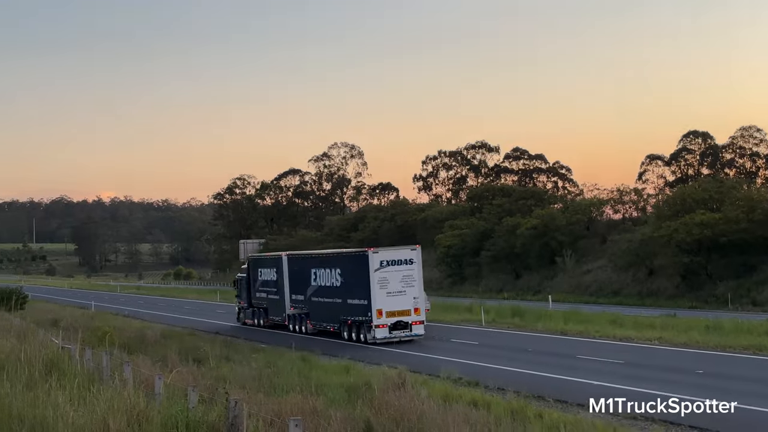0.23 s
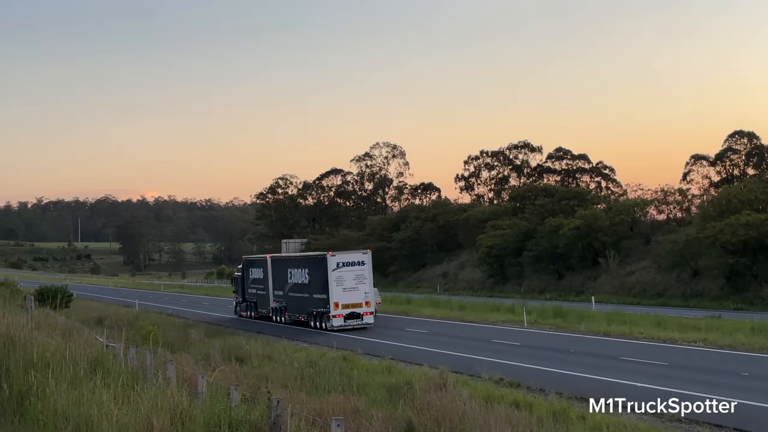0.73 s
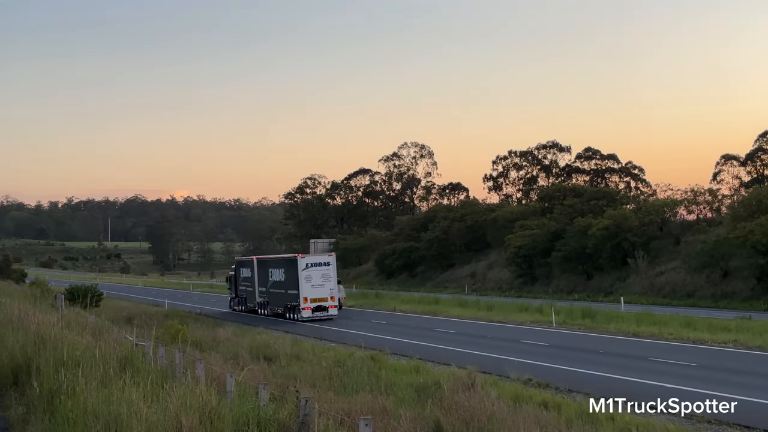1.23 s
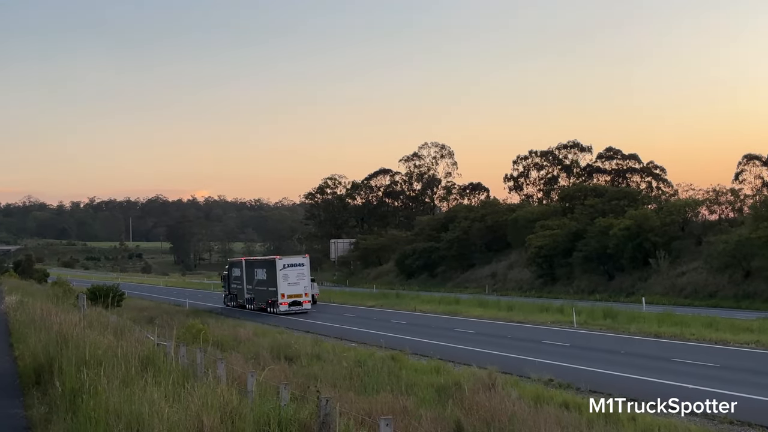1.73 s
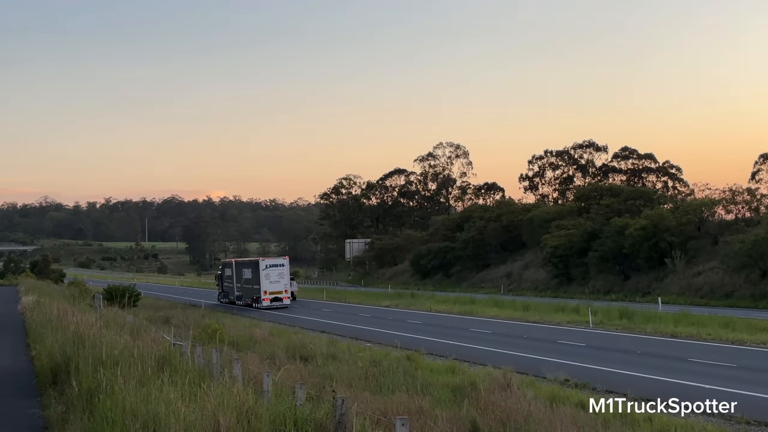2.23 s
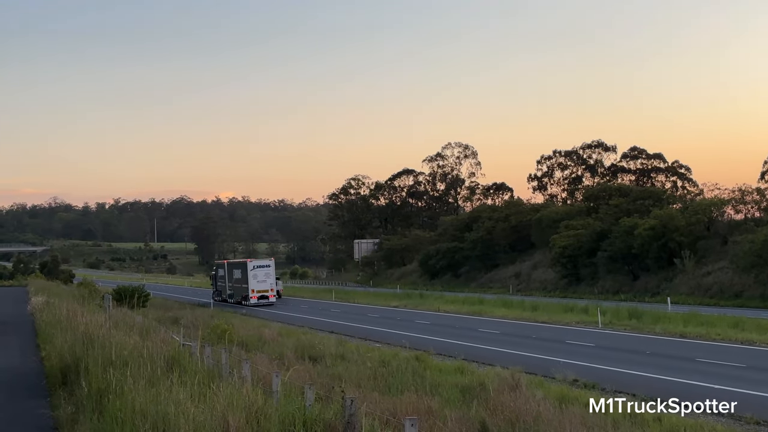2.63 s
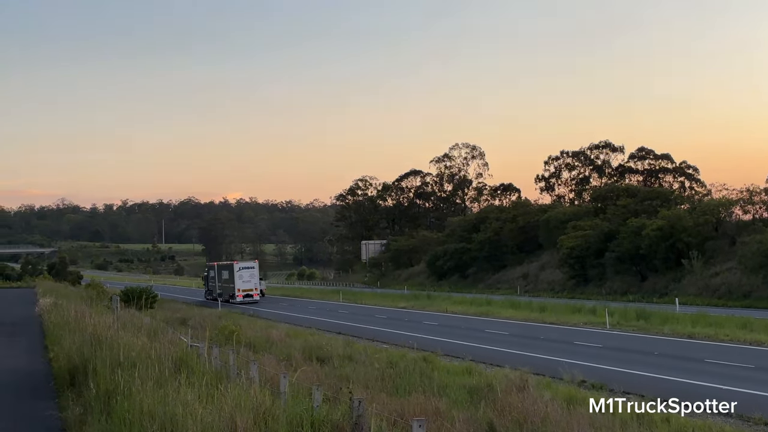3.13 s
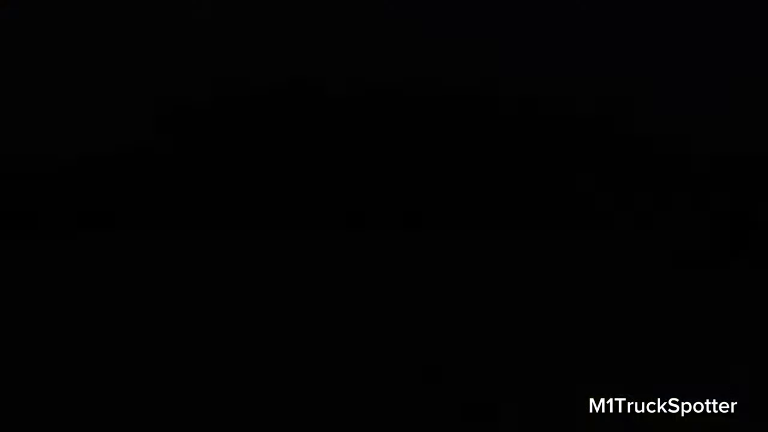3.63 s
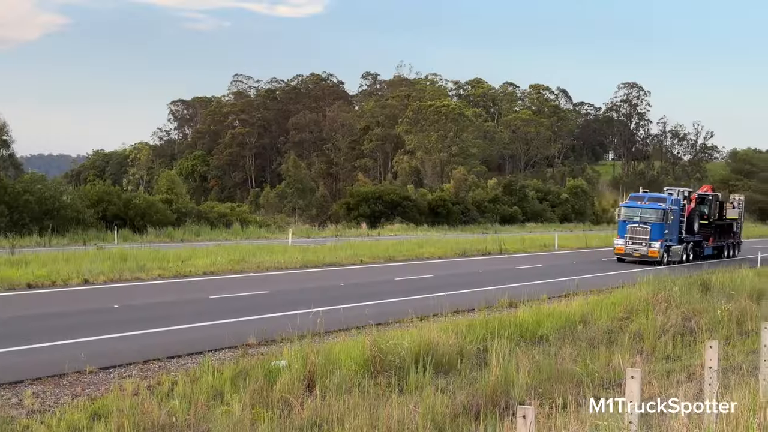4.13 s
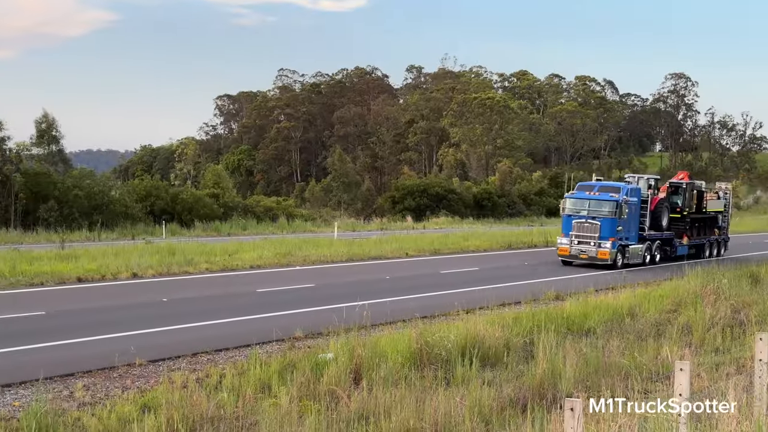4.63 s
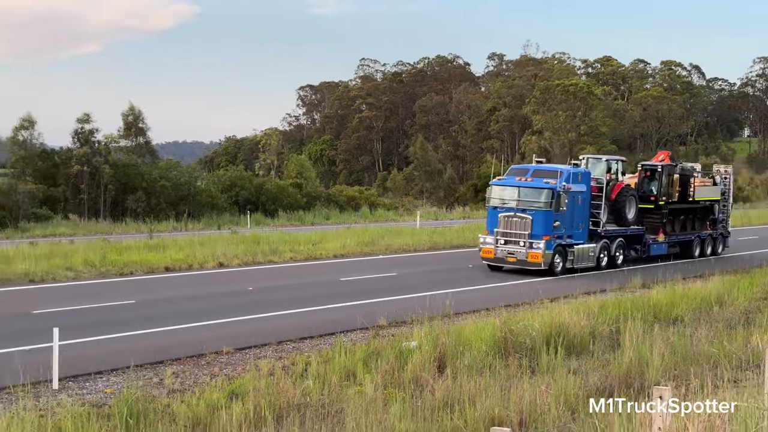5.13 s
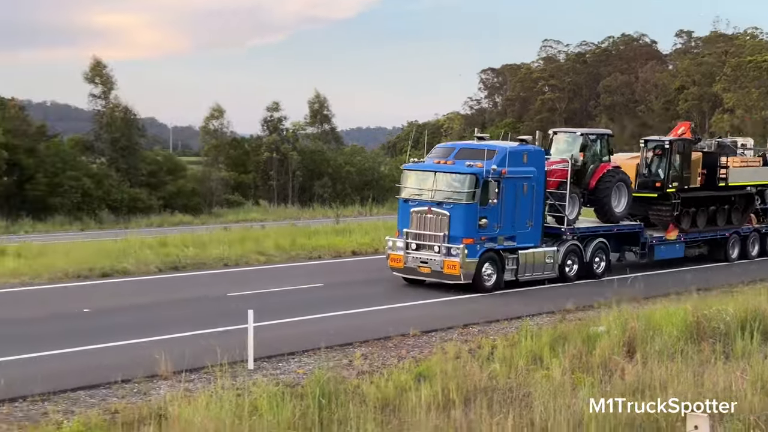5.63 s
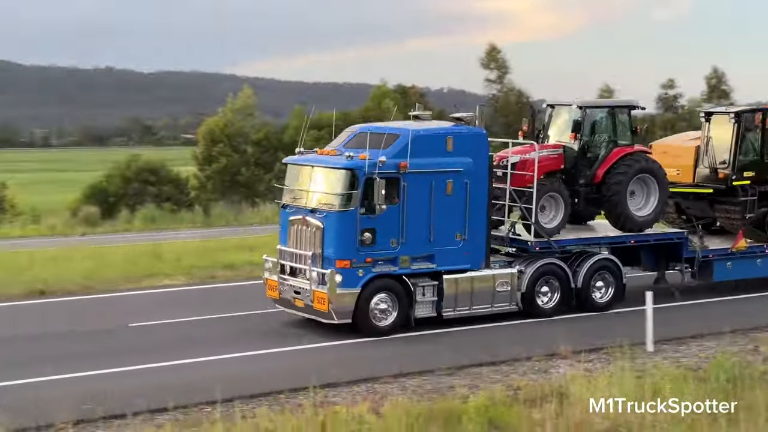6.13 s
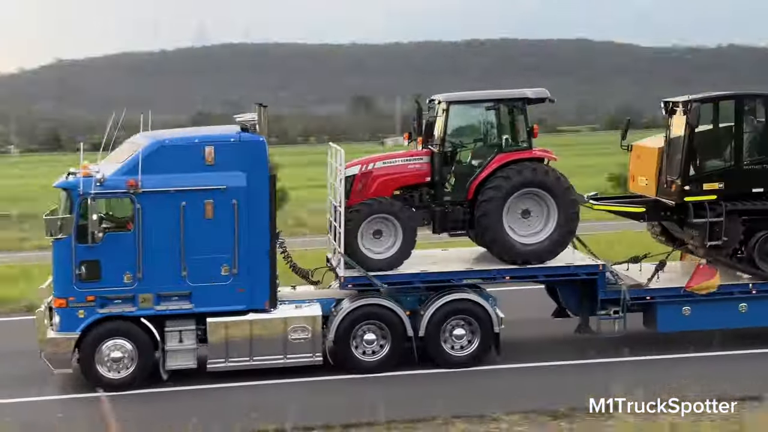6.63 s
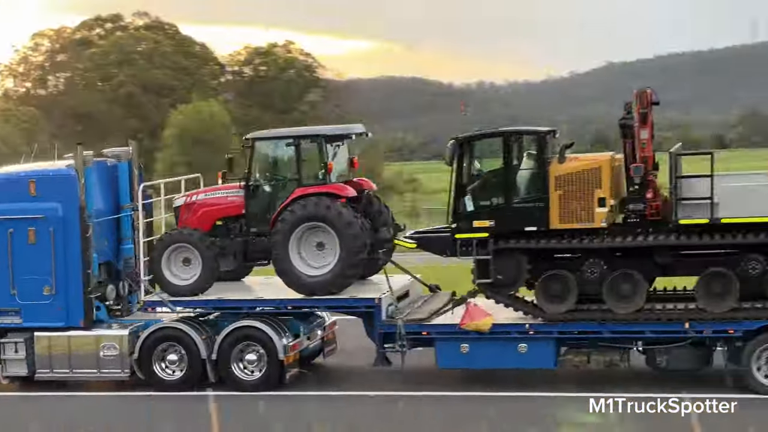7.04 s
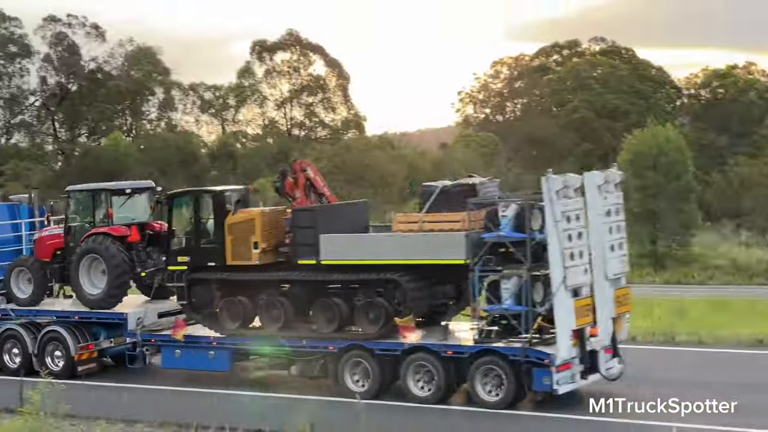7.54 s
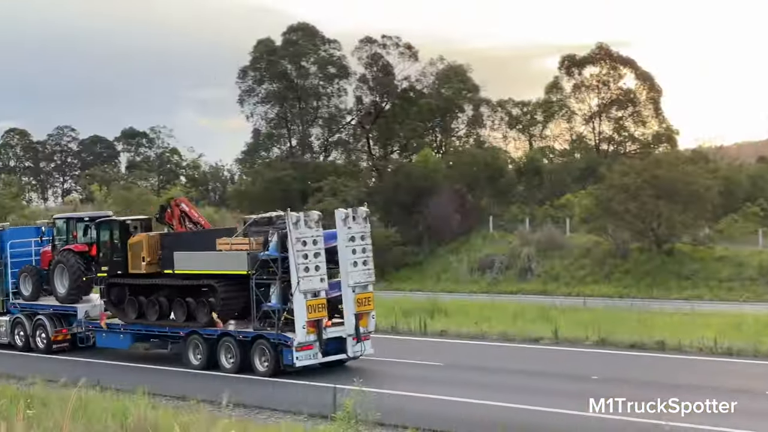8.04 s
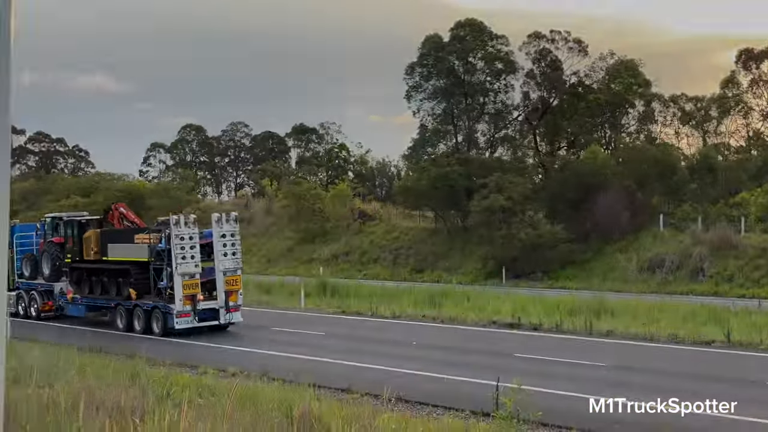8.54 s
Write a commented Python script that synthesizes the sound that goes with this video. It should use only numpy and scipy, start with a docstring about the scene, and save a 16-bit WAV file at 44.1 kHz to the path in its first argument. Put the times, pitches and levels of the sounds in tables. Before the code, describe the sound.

Beside a highway, one truck recedes in fading tyre hiss; a sudden cut brings another passing close with deep engine drone and rattling chains.

```python
"""Beside a country highway a heavy truck recedes, its tyres roaring ever more dully, with insects in the grass.
After an abrupt cut a second diesel truck passes close by at a steady speed: its exhaust drone falls in pitch
and is combed by the reflection off the road, over gear whine, tyre roar, a thin turbo whistle and rattling load chains.
Engine and gears are sines locked to one crankshaft; tyres, air, chains and insects are bands of noise."""
import sys
import numpy as np
from scipy import signal
from scipy.fft import rfft, irfft, next_fast_len
from scipy.io import wavfile
from scipy.ndimage import uniform_filter1d, map_coordinates

SR = 44100
rng = np.random.default_rng(int(sys.argv[2]) if len(sys.argv) > 2 else 0)


def digitize_waveform(pressure):
    """Quantize a signal to 16-bit integers and store it at the path in sys.argv[1].

    Rows of a 2-D input are taken as channels; values are limited to [-1, 1].
    """
    field = np.atleast_2d(pressure).T
    bounded = np.clip(field, -1, 1)
    quanta = np.round(bounded * 32767).astype(np.int16)
    wavfile.write(sys.argv[1], SR, quanta)


N = 387330  # length in samples
CUT_S = 3.663  # the receding truck gives way to the passing one
SOUND_M_PER_S = 343

# The passing truck: its speed, the distance to its lane, the moment it is abreast, its firing rate at rest
SPEED_M_PER_S, LANE_M, ABREAST_S, FIRING_HZ = 27.67, 21.9, 6.789, 75.21


def amp(db):
    """Decibels to gain."""
    return 10 ** (np.asarray(db) / 20)


def unit(x):
    """Scale to rms 1."""
    return x / np.sqrt(np.mean(x ** 2) + 1e-20)


def clock():
    """The time of each sample in seconds."""
    return np.arange(N) / SR


def curves(rows):
    """One value per sample for each column after the time."""
    times, *columns = np.transpose(rows)
    return [np.interp(clock(), times, column) for column in columns]


def wobble(rate):
    """A smooth random curve with rate knots a second, held for 64 samples at a time."""
    knots = rng.standard_normal(int(N * rate / SR) + 4)
    positions = np.arange(0, N, 64) * rate / SR
    return map_coordinates(knots, [positions]).repeat(64)[:N]


def swell_burst(peak_s, peak_db, length_s):
    """Gain of a brief sound that rises and sinks along a bell curve."""
    return amp(peak_db) * np.exp(-((clock() - peak_s) / length_s) ** 2)


def filtered(x, response):
    """Multiply the spectrum of x by a response of frequency."""
    size = next_fast_len(N + SR // 4)
    return irfft(rfft(x, size) * response(np.fft.rfftfreq(size, 1 / SR)), size)[:N]


def rush(spectrum, patchy_db):
    """Coloured noise of rms 1 with drifting patches of gain."""
    grid = signal.stft(rng.standard_normal(N), nperseg=1024)[2]
    patches = uniform_filter1d(rng.standard_normal(grid.shape), size=4, axis=0)  # across frequency
    patches = uniform_filter1d(patches, size=12, axis=1)  # along time
    noise = signal.istft(grid * amp(patchy_db * unit(patches)), nperseg=1024)[1][:N]
    f, db = np.transpose(spectrum)

    def colour(hz):
        return amp(np.interp(np.log(hz + 1), np.log(f), db, left=-120, right=-120))

    return unit(filtered(noise, colour))


def tone(turns, flutter_db, smear, rate):
    """A sine of rms near 1 whose level and phase (smear, radians) are stirred by moving air."""
    level = np.sqrt(2) * amp(flutter_db * wobble(rate))
    return level * np.sin(2 * np.pi * turns + smear * wobble(rate))


def distance(nearest_s):
    """Distance of the passing truck, as a multiple of the distance to its lane."""
    return np.sqrt(1 + ((clock() - nearest_s) * SPEED_M_PER_S / LANE_M) ** 2)


def passing(loudest_s, peak_db, before_db, after_db):
    """Gain of a sound that drives past, losing so many dB per doubling of distance on either side."""
    loss_db = np.where(clock() < loudest_s, before_db, after_db)
    return amp(peak_db - loss_db * np.log2(distance(loudest_s)))


def wheels(loudest_s, peak_db, before_db, after_db, trailer_db):
    """Gain of a rolling sound: the tractor's axles go by first, then the trailer's, trailer_db apart."""
    tractor = passing(loudest_s, peak_db, before_db, after_db)
    trailer = passing(7.37, peak_db + trailer_db, before_db=14, after_db=14)
    return np.hypot(tractor, trailer)


def heard_crank_hz():
    """Crankshaft turns a second, raised on approach and lowered on the way out; three firings make a turn."""
    leaving = SPEED_M_PER_S ** 2 * (clock() - ABREAST_S) / (LANE_M * distance(ABREAST_S))
    return FIRING_HZ / 3 / (1 + leaving / SOUND_M_PER_S)


def road_comb(hz, echo):
    """The road's reflection (strength echo, 0-1) arrives late and cancels or doubles a partial in turn."""
    detour_m = 2.37 / distance(ABREAST_S)  # the extra path shrinks with distance
    lag = detour_m / SOUND_M_PER_S
    return np.abs(1 + echo * np.exp(-2j * np.pi * hz * lag))


def doppler(noise, crank):
    """The noise is squeezed on approach and stretched on the way out, like the engine note."""
    seconds_at_truck = (crank - crank[round(CUT_S * SR)]) * 3 / FIRING_HZ
    return map_coordinates(noise, [seconds_at_truck * SR], order=3)


# Partials of the exhaust bark. Each row: crankshaft order, strength of the road reflection from 0 to 1,
# turning moment in seconds, level there in dB, dB lost per doubling of distance before it, and after it
# (a negative loss is a gain).
BARK_PARTIALS = [(4, .25, 6.4, -40, -2, 3.2), (5, 0, 4.6, -22, -3, 6.5), (7, 0.53, 6.6, -36.5, 2, 8),
                 (8, 0.01, 6.81, -18, 15.5, 29.5), (9, 0.5, 6.74, -21.5, 11.3, 30),
                 (10, 0.2, 6.8, -39.5, 4, 24), (12, 0.55, 5.45, -36.5, -1, 6.2),
                 (13, 0, 7.32, -36.5, 4, 22), (14, 0.13, 7.33, -37, 3, 15), (16, 0, 6.1, -39, 3, 4)]
# The two partials that swell and sink most as the truck passes. Each row: time in seconds,
# level of the firing tone's octave in dB, level of crankshaft order 11 in dB.
SWELLING_PARTIALS = [(3.67, -20, -36.5), (4.75, -21.5, -33), (5.47, -34.5, -32.5), (5.88, -24.5, -20.5),
                     (6.42, -12, -31.5), (7.05, -18.5, -32.5), (7.3, -37, -25.5), (7.85, -32, -37.5),
                     (8.25, -39, -64), (8.78, -39, -55)]


def exhaust(crank, crank_hz):
    """Six cylinders fire three times a turn; unequal cylinders fill in the other orders."""
    octave_db, eleventh_db = curves(SWELLING_PARTIALS)
    firings, firing_hz = 3 * crank, 3 * crank_hz
    drone = passing(loudest_s=6.68, peak_db=-8.1, before_db=8.6, after_db=14.6)
    drone *= road_comb(firing_hz, echo=0.85) * tone(firings, flutter_db=0.17, smear=.03, rate=13)
    drone += amp(octave_db) * tone(2 * firings + 1 / 2, flutter_db=1.0, smear=0.068, rate=14)

    def partial(order):
        return tone(order * crank + rng.random(), flutter_db=1.1, smear=.16, rate=14)

    bark = amp(eleventh_db) * partial(order=11)
    for order, echo, *swell in BARK_PARTIALS:
        bark += passing(*swell) * road_comb(order * crank_hz, echo) * partial(order)
    return drone + bark


# Partials of the gear train. Each row: crankshaft order, level in dB within the layer.
GEAR_TRAIN_PARTIALS = [(18, -13.5), (19, -2), (21.25, -1.5), (22, -2), (24, -10), (33.2, -3), (36.5, -3)]
# Singing partials of the trailer's tread. Each row: crankshaft order, level in dB within the layer.
TREAD_PARTIALS = [(36.6, 0.5), (42.9, -7), (43.7, -3.5), (54.8, -2.5)]


def whine(crank, crank_hz):
    """Wavering gear and tread tones and the turbo's thin whistle, all gliding with the engine note."""
    mesh = road_comb(22.72 * crank_hz, echo=0.27) * tone(22.72 * crank, flutter_db=1.8, smear=.5, rate=13)
    axle = tone(18.3 * crank, flutter_db=1.5, smear=.35, rate=13)
    train = sum(amp(db) * tone(order * crank, flutter_db=3.0, smear=0.78, rate=10)
                for order, db in GEAR_TRAIN_PARTIALS)
    tread = sum(amp(db) * tone(order * crank, flutter_db=0.5, smear=0.97, rate=16)
                for order, db in TREAD_PARTIALS)
    turbo = amp(2 * wobble(4)) * tone(389 * crank, flutter_db=3, smear=2.5, rate=130)
    mesh *= passing(loudest_s=5.5, peak_db=-25.5, before_db=16.5, after_db=7.5)
    axle *= passing(loudest_s=6.4, peak_db=-28, before_db=9, after_db=10)
    train *= passing(loudest_s=6.5, peak_db=-31.7, before_db=8, after_db=11.5)
    tread *= passing(loudest_s=7.5, peak_db=-37, before_db=9, after_db=12.5)
    turbo *= passing(loudest_s=6.3, peak_db=-62, before_db=8, after_db=11)
    return mesh + axle + train + tread + turbo


# Noise colours of the passing truck, from its deepest layer to its finest.
# Each row: frequency in Hz, relative level in dB per Hz.
BUFFET_COLOUR = [(15, -4), (30, -3), (50, 1), (70, 4), (130, -31)]
BOOM_COLOUR = [(45, -12), (90, 2.5), (130, 0.5), (220, -1.5), (320, 0), (450, -27)]
CHASSIS_COLOUR = [(220, -35), (320, -4.5), (390, -4.5), (470, 4.5), (580, -2), (700, -8.5), (1000, -12)]
ROAR_COLOUR = [(350, -34), (600, -4), (650, -5.5), (717, -7.5), (883, -6.5), (1080, -6.5), (1430, -9.5),
               (2600, -24), (3380, -59), (5720, -120)]
HISS_COLOUR = [(1120, -13), (1900, 0), (2790, -5), (3410, -6.5), (3900, -18), (5070, -47), (8580, -120)]
AIR_COLOUR = [(2290, -12), (3900, 0), (5810, -2.5), (9500, -14.5), (12400, -41), (20900, -120)]
FIZZ_COLOUR = [(4710, -19), (8000, -4), (15100, -12), (15700, -13)]


def rolling(crank):
    """Tyres, chassis and displaced air; combustion clatter pulses part of the noise."""
    clatter = 1 + .16 * sum(np.cos(2 * np.pi * order * crank) for order in range(1, 4))
    buffet = passing(loudest_s=6.1, peak_db=-38.5, before_db=13, after_db=16)
    buffet *= rush(BUFFET_COLOUR, patchy_db=0.0)
    boom = wheels(loudest_s=6, peak_db=-25, before_db=9, after_db=8, trailer_db=-7.5)
    boom *= rush(BOOM_COLOUR, patchy_db=1.0)
    chassis = wheels(loudest_s=6, peak_db=-27, before_db=6.5, after_db=9, trailer_db=-5.5)
    chassis *= doppler(rush(CHASSIS_COLOUR, patchy_db=0.5), crank)
    roar = wheels(loudest_s=6, peak_db=-24, before_db=10, after_db=6, trailer_db=-6.0)
    roar *= doppler(rush(ROAR_COLOUR, patchy_db=1.5), crank)
    hiss = wheels(loudest_s=6, peak_db=-34, before_db=10.5, after_db=4.5, trailer_db=-3.5)
    hiss *= doppler(rush(HISS_COLOUR, patchy_db=1.0), crank)
    air = wheels(loudest_s=6, peak_db=-39.5, before_db=10.5, after_db=3.5, trailer_db=-3.5)
    air *= rush(AIR_COLOUR, patchy_db=1.3)
    fizz = wheels(loudest_s=6.5, peak_db=-46, before_db=11.5, after_db=9.5, trailer_db=-4.5)
    fizz *= amp(.6 * wobble(35)) * rush(FIZZ_COLOUR, patchy_db=0.4)
    pulsed = (chassis + roar) * unit(clatter) + (hiss + air) * unit(2 + clatter)  # hiss pulses less
    return buffet + boom + pulsed + fizz


# Shakes of the load chains on the trailer. Each row: start in seconds, level in dB.
CHAIN_SHAKES = [(6.782, -36), (6.8, -46), (6.908, -39), (7.085, -39), (7.14, -37), (7.155, -43),
                (7.485, -44), (8.426, -50), (8.52, -44)]
# Bright colour of the links. Each row: frequency in Hz, relative level in dB per Hz.
CHAIN_COLOUR = [(2500, -25), (5000, 1), (9000, 1), (12000, -2), (15500, -11)]


def chains(t60=0.079):
    """Each shake of a chain is a short bright jingle that dies by 60 dB in t60 seconds."""
    t = clock()
    shakes = sum(amp(db - 60 * np.abs(t - s) / t60) * (t >= s) for s, db in CHAIN_SHAKES)
    return shakes * rush(CHAIN_COLOUR, patchy_db=1)


def fading(start_db, loss_db):
    """Gain of a sound that drives steadily away, losing loss_db per doubling of distance."""
    doubling_s = 2.08  # the receding truck is twice as far away by then
    return amp(start_db - loss_db * np.log2(1 + clock() / doubling_s))


# Surges in the receding roar. Each row: peak in seconds, dB added, length in seconds.
ROAR_SURGES = [(1.1, 2, .35), (2.8, 1.5, 0.3)]
# The receding truck's singing tread, which swells once. Each row: time in seconds, level in dB.
FAR_TREAD_LEVEL = [(0, -55), (1.7, -50), (2.2, -46.5), (2.9, -39), (3.2, -50), (3.66, -57)]
# Noise colours of the receding truck, from its deepest layer to its finest.
# Each row: frequency in Hz, relative level in dB per Hz.
FAR_RUMBLE_COLOUR = [(15, -69), (25, -40.5), (43, -24), (50, -17), (64, -1.5), (81, 1), (97, -4), (135, 0),
                     (224, -17.5), (300, -13), (390, -39), (660, -120)]
FAR_BODY_COLOUR = [(130, -51), (220, -20.5), (360, -7.5), (393, -7), (426, -5), (660, -3), (750, -2),
                   (980, -28), (1650, -120)]
FAR_ROAR_COLOUR = [(400, -16), (680, -11), (715, -7.5), (837, 1), (910, -3), (1200, -5.5), (1330, -9.5),
                   (1810, -9.5), (2150, -17), (2320, -19.5), (2600, -28), (3380, -33), (5720, -120)]
FAR_HISS_COLOUR = [(1180, -27), (2000, -2.5), (2640, -9), (2880, -7), (4130, -10.5), (4660, -14),
                   (5710, -16.5), (8000, -25.5), (10400, -46), (17600, -120)]
FAR_FIZZ_COLOUR = [(3500, -12), (6000, 9), (9000, 7), (11000, -2.5), (15500, -10)]


def receding_truck():
    """Most layers sink at their own rates, fizz fastest; the firing tone holds and the tread swells once."""
    t = clock()
    rumble = fading(start_db=-40, loss_db=6.5) * rush(FAR_RUMBLE_COLOUR, patchy_db=1)
    firing = fading(start_db=-52, loss_db=-.5) * tone(72 * t, flutter_db=2.0, smear=1.0, rate=5.54)
    body = fading(start_db=-34.5, loss_db=9.4) * rush(FAR_BODY_COLOUR, patchy_db=0.5)
    surge_db = sum(db * np.exp(-((t - s) / length) ** 2) for s, db, length in ROAR_SURGES)
    roar = fading(start_db=-32.5, loss_db=6.06) * amp(surge_db) * rush(FAR_ROAR_COLOUR, patchy_db=1.5)
    hiss = fading(start_db=-41.5, loss_db=8.76) * rush(FAR_HISS_COLOUR, patchy_db=1.2)
    fizz = fading(start_db=-53, loss_db=13.8) * rush(FAR_FIZZ_COLOUR, patchy_db=.8)
    low_hum = fading(start_db=-41, loss_db=13.2) * tone(397 * t, flutter_db=2.2, smear=.55, rate=7)
    high_hum = fading(start_db=-37.5, loss_db=12.8) * tone(673 * t, flutter_db=2, smear=.55, rate=7)
    tread_colour = [(780, -25), (855, 0), (910, -4), (1080, -12), (1200, -30)]  # Hz, dB per Hz
    tread = amp(curves(FAR_TREAD_LEVEL)[0]) * rush(tread_colour, patchy_db=1.3)
    return rumble + firing + body + roar + hiss + fizz + low_hum + high_hum + tread


# The shrilling of the chorus. Each row: frequency in Hz, relative level in dB per Hz.
INSECT_COLOUR = [(7800, -40), (8700, -8), (9100, 0), (9450, -6), (9850, -13), (10300, -40)]
# Single insects buzzing up. Each row: peak in seconds, pitch in Hz, level in dB, length in seconds.
INSECT_BUZZES = [(2.45, 9850, -74, .25), (3.87, 9130, -63, .2), (4.15, 13050, -72, .2)]


def wildlife():
    """A chorus of insects in the grass, a few brief shrill buzzes and one short bird note."""
    t = clock()
    bird = swell_burst(peak_s=4.113, peak_db=-49, length_s=.01)
    bird *= tone(3430 * t, flutter_db=1, smear=1, rate=110)
    buzzes = 0
    for s, hz, db, length in INSECT_BUZZES:
        narrow_band = [(hz - 500, -25), (hz, 0), (hz + 500, -25)]
        buzzes += swell_burst(s, db, length) * rush(narrow_band, patchy_db=2)
    chorus_db = np.where(t < CUT_S, -71.5, -66)  # louder after the cut
    chorus = amp(chorus_db) * rush(INSECT_COLOUR, patchy_db=4.0)
    return bird + buzzes + chorus


# Clicks around the cut. Each row: start in seconds, level in dB.
CUT_CLICKS = [(3.6628, -20), (3.683, -12)]


def clicks(decay=.0007):
    """Two sharp clicks around the cut, each a one-sided pulse decaying in decay seconds."""
    t = clock()
    return sum(amp(db) * np.exp(-np.abs(t - s) / decay) * (t >= s) for s, db in CUT_CLICKS)


def scene():
    """One truck before the cut, the other after it, wildlife throughout."""
    crank_hz = heard_crank_hz()
    crank = np.cumsum(crank_hz) / SR  # turns so far
    passing_truck = exhaust(crank, crank_hz) + whine(crank, crank_hz) + rolling(crank) + chains()
    trucks = np.where(clock() < CUT_S, receding_truck(), passing_truck)
    return (trucks + wildlife() + clicks())[None]


def record(dry):
    """Soft saturation rounds off the highest peaks, then nothing above the band limit is kept."""
    ceiling, top_hz = .72, 15750
    soft = dry[0] / (1 + np.abs(dry[0] / ceiling) ** 8) ** (1 / 8)
    return filtered(soft, lambda hz: hz < top_hz)[None]


dry = scene()
out = record(dry)
digitize_waveform(out)
```